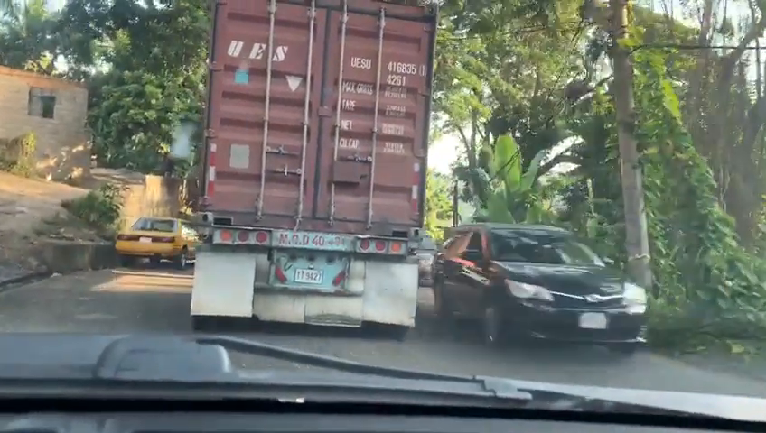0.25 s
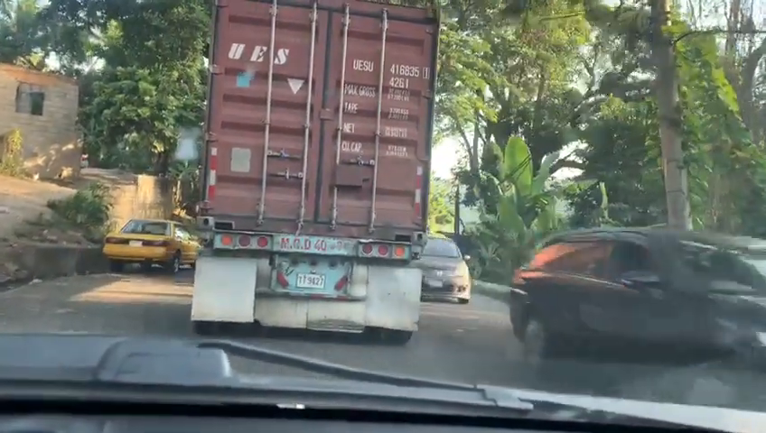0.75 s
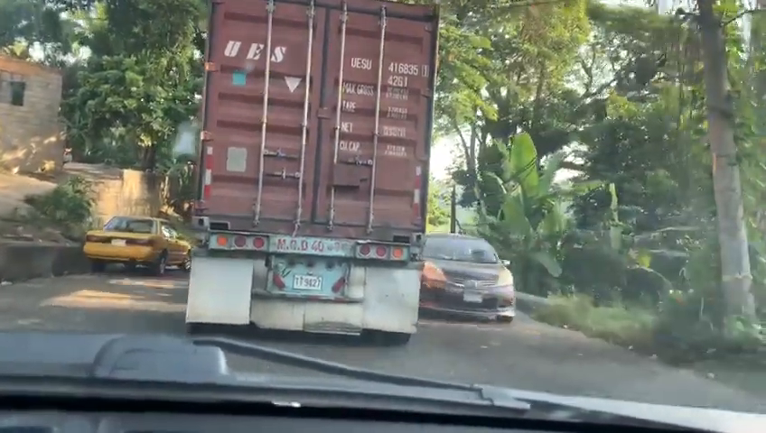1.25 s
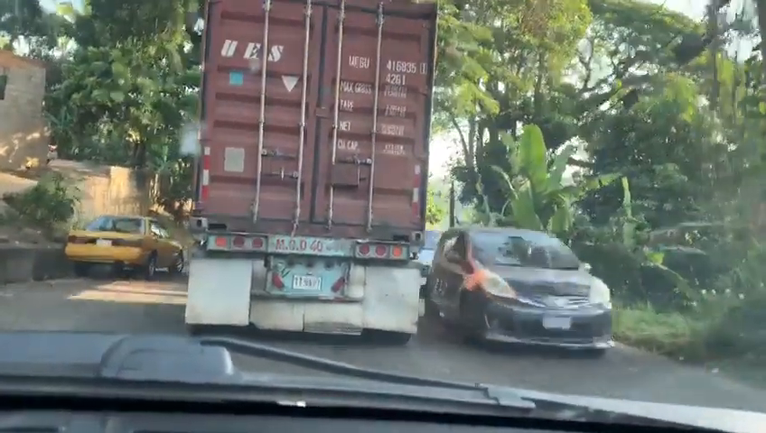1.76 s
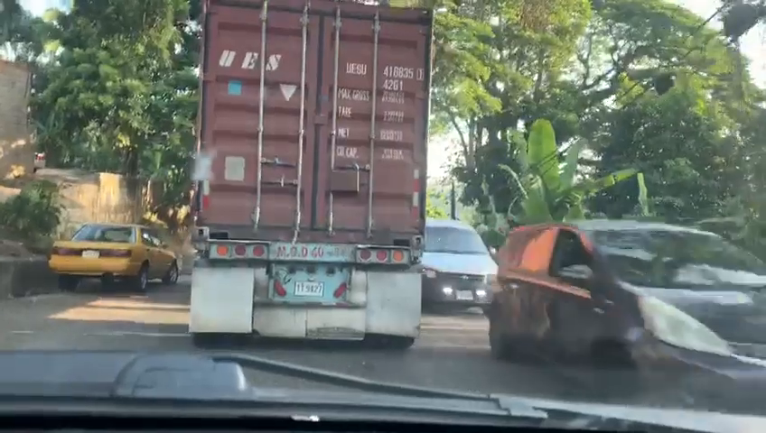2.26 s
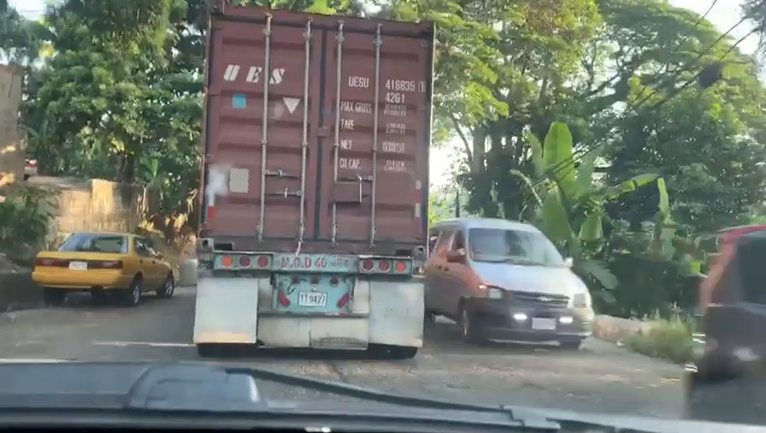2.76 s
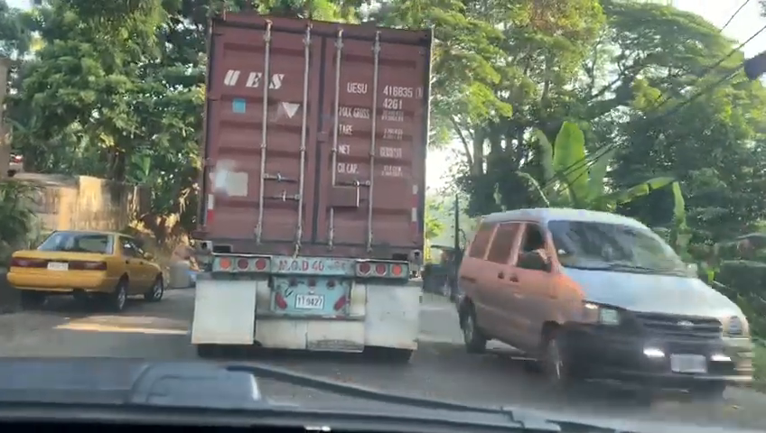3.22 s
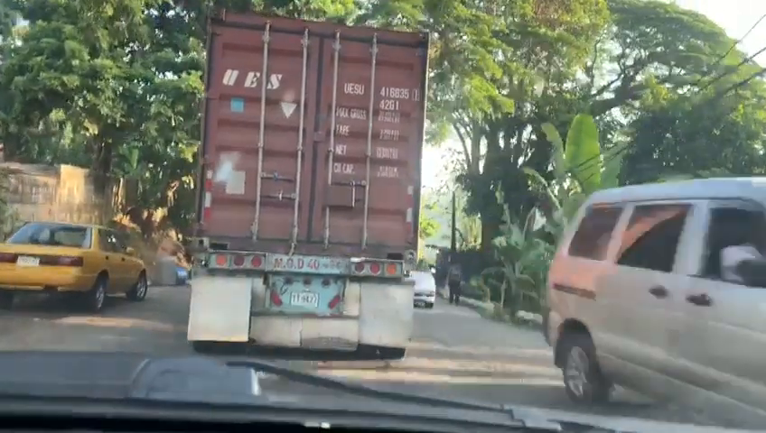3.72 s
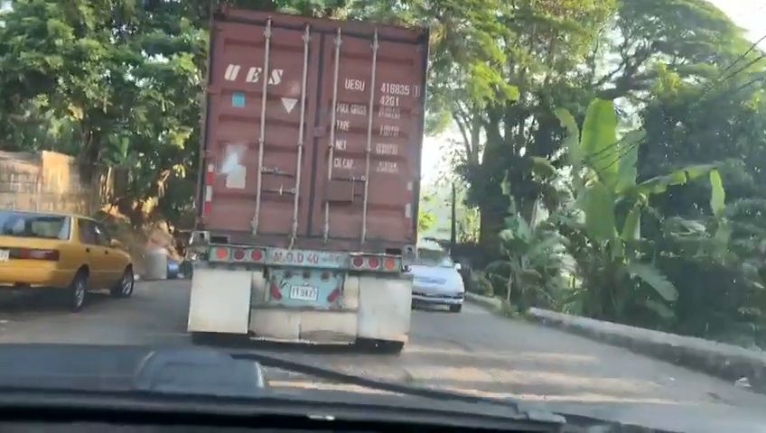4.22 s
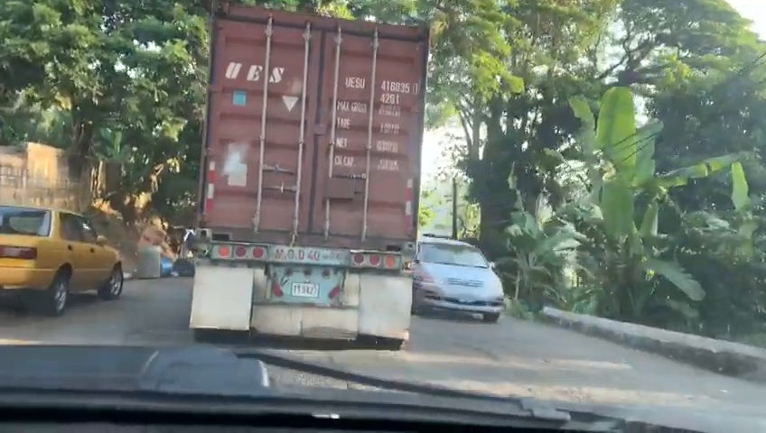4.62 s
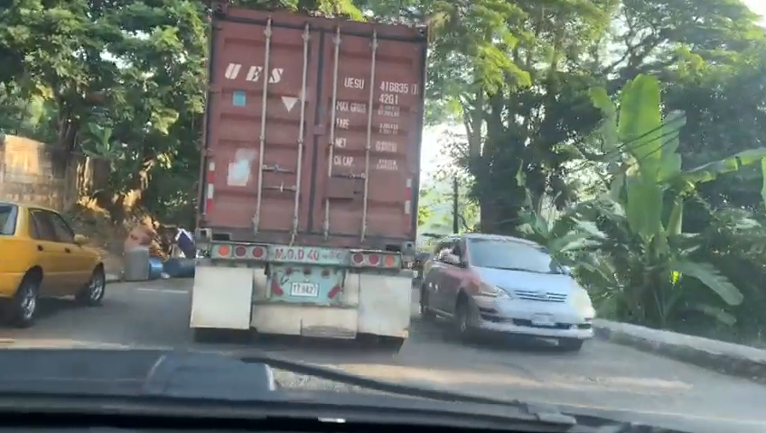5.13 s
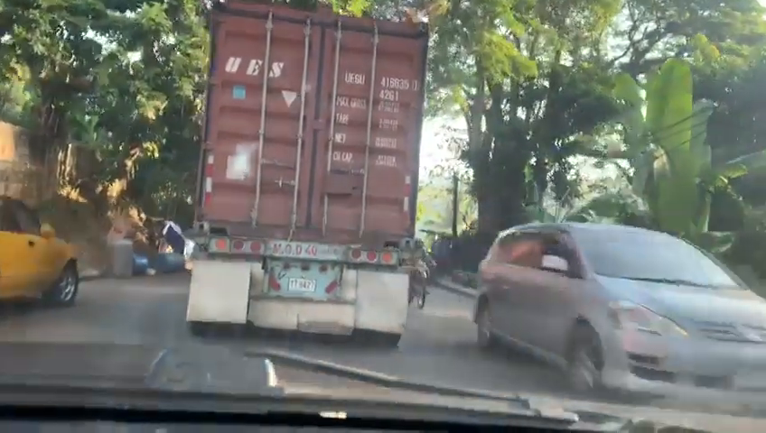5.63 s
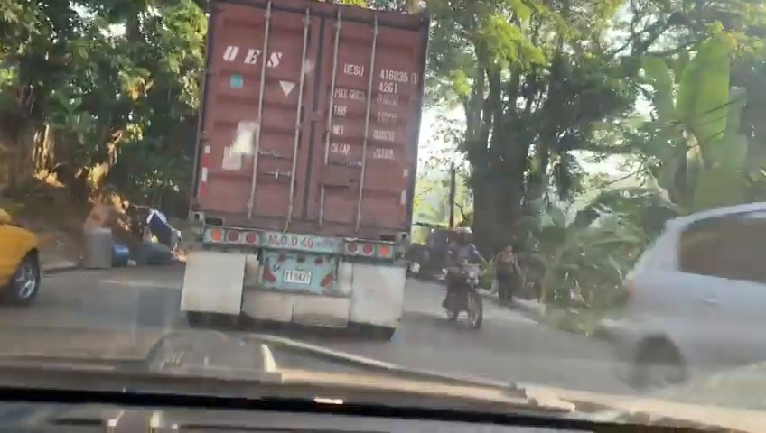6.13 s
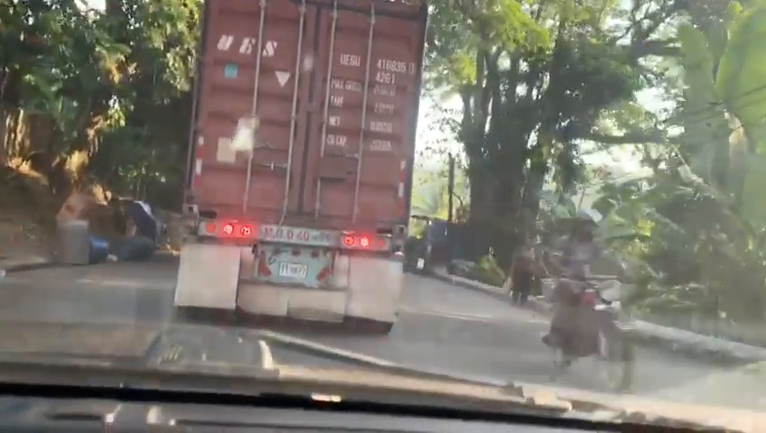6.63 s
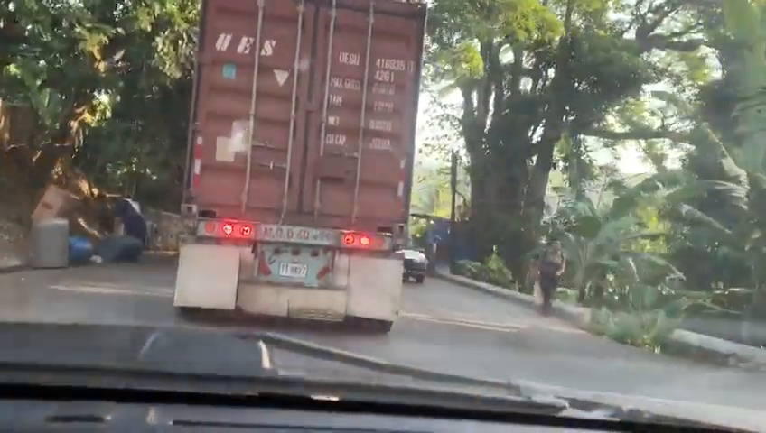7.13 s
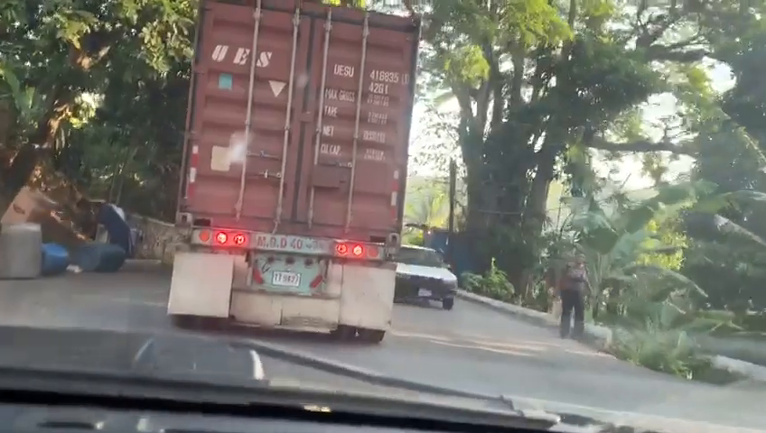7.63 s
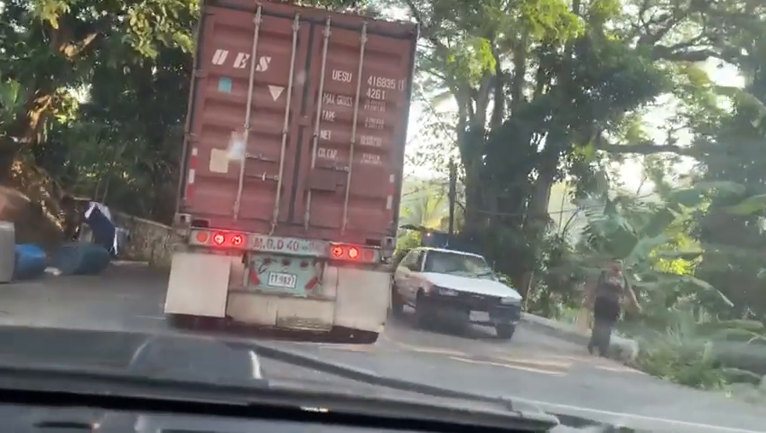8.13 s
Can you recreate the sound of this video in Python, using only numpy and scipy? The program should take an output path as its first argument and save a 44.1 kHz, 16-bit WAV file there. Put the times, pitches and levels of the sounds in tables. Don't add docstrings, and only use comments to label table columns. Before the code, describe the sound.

Low idling rumble and whooshing oncoming traffic in a rolling car cabin, hard joint thuds, finally a rough rapid exhaust rattle from a heavy truck.

```python
import sys
import numpy as np
from scipy import signal
from scipy.fft import rfft, irfft, next_fast_len
from scipy.io import wavfile
from scipy.ndimage import uniform_filter1d, map_coordinates

SR = 44100
rng = np.random.default_rng(int(sys.argv[2]) if len(sys.argv) > 2 else 0)


def unload_audio(sound):
    columns = np.transpose(np.atleast_2d(sound))
    steps = np.round(np.clip(columns, -1, 1) * 32767)
    wavfile.write(sys.argv[1], SR, steps.astype(np.int16))


def amplitude_ratio(level_db):
    exponent = np.asarray(level_db, float) / 20
    return 10 ** exponent


N = 369028

# time in seconds, blast rate in Hz, effort in dB, high pipe note over low in dB.
BRAKE = [(6.9, 34.83, -27, -1), (7.0, 34.65, -26, 5.5), (7.2, 33.92, -23, -2), (7.26, 33.24, -14.5, -10),
         (7.53, 28.39, -11, -5.5), (7.68, 31.15, -16.5, -1), (7.83, 33.11, -13.5, 10),
         (7.885, 32.74, -14, 9), (7.925, 28.77, -13.5, 15), (8.04, 29.13, -13.5, 11), (8.12, 29.14, -16, 3),
         (8.26, 31.01, -14, 8.5), (8.37, 31.63, -14, 14)]
# time in seconds, high note in Hz, low note in Hz.
PIPE_NOTES = [(6.9, 263, 151), (7.5, 265, 150), (7.7, 292, 156), (8.1, 308, 147), (8.37, 323, 166)]
# time in seconds, level in dB.
STUMBLES = [
    (7.33, -7),
    (7.39, -8),
    (7.49, -8),
    (7.555, -8),
    (7.625, -6),
    (7.655, -6),
]
# delay in seconds, level in dB.
ECHOES = [(.0065, -41), (.012, -23), (.019, -15.5), (.026, -25.5), (.04, -21.5)]
# time in seconds, peak in dB.
SNAPS = [(7.8325, -18), (7.8625, -21), (7.9278, -26), (7.9617, -23), (7.9967, -22), (8.0306, -18),
         (8.064, -24), (8.1004, -24.5), (8.1348, -19), (8.1688, -25.5), (8.2022, -21), (8.2341, -23.5),
         (8.2665, -23.5), (8.298, -23), (8.3299, -23)]
# time in seconds, peak in dB.
ROCKER_BLOWS = [(7.8894, -34), (7.9264, -38), (7.9608, -31.5), (7.9957, -31), (8.0301, -34), (8.0995, -31),
                (8.1394, -44), (8.1678, -45), (8.2342, -28), (8.2666, -29), (8.2975, -29), (8.33, -25)]
# time in seconds, fourth, fifth and seventh order in dB.
BRAKE_ORDERS = [(6.9, -36, -38, -38), (7.0, -27.5, -41, -30), (7.2, -26, -34, -32),
                (7.27, -16.5, -33, -27.5), (7.4, -21, -29, -28.5), (7.48, -23, -26, -31),
                (7.56, -27, -20, -33), (7.66, -28, -27, -44), (7.749, -30, -36, -37),
                (7.97, -37.5, -29, -40.5), (8.37, -36, -30, -38)]
# frequency in Hz, density in dB per Hz.
TICK_SPECTRUM = [(2000, -30), (5000, -18), (8000, -12), (9300, -8), (10400, 2), (11500, -1), (12500, -25)]
COVER_SPECTRUM = [(2000, -28), (2500, -3), (3200, -9.5), (3800, -3.5), (4400, -4), (5000, -10),
                  (6500, -24.5)]
CRACK_SPECTRUM = [(1200, -35), (2200, -5.5), (5000, -6.5), (9000, -3), (12000, -2.5), (13000, -38)]
SIZZLE_SPECTRUM = [(5000, -40), (7500, -6), (8700, -5), (9800, -7.5), (12300, -14), (13000, -42)]

# time in seconds, firing rate in Hz.
IDLE = [(0, 21.54), (1.5, 21.76), (2.5, 22.44), (3.8, 22.82), (5.2, 23.19), (6.5, 23.47), (8.37, 24.32)]
# multiple of the firing rate, early level in dB, late level in dB.
ENGINE_ORDERS = [(3, -28, -28.5), (7, -32, -31.5), (9, -40, -39.5), (10, -39, -31.5), (11, -33, -40.5),
                 (15, -37, -37.5)]
# time in seconds, lift in dB.
LOAD = [(0, -5), (.5, -10), (.9, 2), (1.3, -7.5), (1.6, 2.5), (2.1, 3.5), (2.3, -3.5), (2.9, 5), (3.6, 0.5),
        (4.4, 2), (5.2, 3), (5.7, 4), (6.2, 1.5), (6.6, 2), (7, -1.5), (8.37, -1)]
# time in seconds, pitch in Hz, road shake in dB.
BOOM = [(0, 65.27, -26), (1.4, 65.1, -26.5), (1.7, 65.4, -26.5), (1.85, 76.7, -38.5), (2.15, 57.9, -19.5),
        (2.45, 63.4, -31.5), (2.75, 65, -32), (3.2, 50.81, -23.5), (4.15, 53.32, -20), (4.85, 56.3, -21.5),
        (5.05, 65.6, -23), (5.25, 59.56, -15.5), (5.95, 60.5, -17.5), (6.3, 71.87, -35),
        (6.75, 61.85, -30.5), (7.15, 71.2, -24.5), (7.9, 61.22, -25), (8.37, 61, -18.5)]
# time in seconds, swell of the boom in dB.
JOLTS = [(.81, 2), (1.1, -11), (1.42, 6.5), (2.24, 4), (2.38, 15), (4.131, 3.5), (4.35, -6), (4.8, 10),
         (4.942, 7), (5.22, -3), (6.43, 13), (6.54, 14), (6.8, 9.5), (7.66, -5), (7.86, 5), (8.09, 3)]
# start in seconds, end in seconds, pitch in Hz, level in dB.
NEARING = (4.33, 4.66, 308, -29)

# start in seconds, length in seconds, level in dB, tilt in dB per overtone.
TAPS = [
    (2.999, 0.094, -44.5, 0.6),
    (3.197, 0.075, -49, 0),
]
# multiple of the disc pitch, level in dB.
HORN_OVERTONES = [(2, 1), (3, -21), (4, 1), (5, 1.5), (6, -5), (7, -7), (8, -18), (9, -12), (10, -13),
                  (11, -12.5), (12, -12), (13, -17), (14, -19)]
HORN_HZ = (491, 414)

# time in seconds, peak in dB, note in Hz.
BUMPS = [
    (2.394, -28, 110),
    (4.527, -24, 121),
    (4.639, -9, 163),
    (4.7, -16, 127),
    (4.772, -9, 151),
    (6.212, -13.5, 163),
    (6.27, -11, 157),
    (6.319, -10.5, 220),
    (6.356, -10, 172),
]
# start in seconds, end
# in seconds, pitch in Hz, level in dB.
DRONES = [(0.8, 1.25, 230, -34), (2.95, 3.7, 199, -33), (4.55, 4.92, 123, -25.5), (4.85, 5.15, 232, -28.5),
          (5.4, 5.9, 233, -30), (5.45, 5.75, 250, -36.5), (6.95, 7.8, 150, -34.5), (4.85, 5.1, 255, -27),
          (3.8, 4.55, 252, -30.5), (6.15, 6.95, 176, -29.5), (6.15, 6.3, 211, -35.5), (1.02, 1.65, 80, -31),
          (2.85, 3.5, 100, -30.5), (4.38, 4.58, 94, -26), (5.65, 6.05, 73, -28.5), (1.15, 1.5, 70, -23),
          (0.5, 0.71, 335, -36), (1.3, 1.67, 243, -31), (6.2, 6.55, 230, -36), (6.1, 6.5, 322, -31),
          (5.9, 6.6, 142, -33)]
# time in seconds, peak in dB, note in Hz.
KNOCKS = [
    (1.813, -29, 657),
    (2.389, -22, 675),
    (2.707, -22, 510),
]

# time in seconds, level in dB, t60 in seconds.
VENTS = [
    (4.03, -41, 2.5),
    (7.47, -41, 2.2),
    (7.58, -42, 2.5),
]
# start in seconds, end in seconds.
LEAKS = [
    (-1, .36),
    (3.02, 3.5),
    (4.07, 4.3),
    (7.25, 7.5),
    (7.55, 9),
]
LEAK_DB = [-49, -47.5, -53, -56, -54]
# start in seconds, end in seconds, centre in Hz, width in Hz,
# beat in Hz.
BUZZ = [
    (2.3, 4.05, 10250, 500, 46),
    (3.0, 3.78, 10900, 1300, 46),
    (6.88, 7.3, 9500, 300, 100),
    (5.4, 6.95, 10300, 700, 50),
]
BUZZ_DB = [-60.5, -61.5, -44.5, -80]
# nearest time in seconds, level in dB, seconds from nearest to half power.
PASSES = [(0.051, 9, 0.34), (1.15, -1.5, 0.05), (2, -9, 0.094), (3.2, -5.5, 0.18), (4.25, -1.5, 0.37),
          (4.9, -1, 0.37), (5.6, -2, 0.21), (6.15, -3.5, 0.18), (6.9, 3, 0.44), (7.599, 3, 0.27),
          (8.05, 0, 0.28)]

# frequency in Hz, density in dB per Hz.
JET_SPECTRUM = [(2000, -33), (3000, -12), (4000, -0.5), (5500, -4), (7500, -2), (9500, -16), (11500, -3.5),
                (12000, -42)]
RUMBLE_SPECTRUM = [(15, -45), (25, 3.5), (45, 13.5), (62, 12), (90, 10.5), (115, -1), (140, -57)]
BODY_SPECTRUM = [(80, -5.5), (110, -3.5), (160, 0), (240, -3), (350, -9.5), (420, -7), (480, -15),
                 (560, -67)]
ROAR_SPECTRUM = [(150, -28.5), (220, 1), (300, -1), (400, -1), (470, -12), (560, -52.5)]
CLATTER_SPECTRUM = [(350, -19), (480, -0.5), (580, 0), (650, 5), (730, -3), (840, 4), (930, -3), (1050, -1),
                    (1110, 1.5), (1180, -2), (1300, -6), (1700, -9), (2200, -64)]
HISS_SPECTRUM = [(1200, -3.5), (1700, 1.5), (2520, 1.5), (2720, -2.5), (3700, -4), (5000, -9),
                 (6500, -13.5), (7500, -14.5), (8500, -31.5)]
TOP_SPECTRUM = [(4500, -25), (6000, -6), (7500, -4), (8500, -2), (10000, 0), (11200, -4), (11600, -12),
                (11900, -40)]

# frequency in Hz, likeness from 0 to 1.
ALIKE = [(60, .95), (350, .83), (550, .3), (750, .6), (1200, .75), (1420, .99), (1650, .968), (1900, .55),
         (2600, .55), (3100, .2), (3800, .5), (6000, .15), (7300, .4), (7800, .995)]
# frequency in Hz, left lead in radians.
LEAD = [(300, -.5), (550, -2), (1100, -1.8), (1430, -3.14), (1700, -3.14), (1900, -6.4), (2250, -6.9),
        (2650, -9.4), (3800, -12.9), (6800, -19.1), (7700, -21.99), (9350, -21.99), (10400, -25.13),
        (11700, -25.3)]
# frequency in Hz, half of left minus right in dB.
CABIN_PAN = [(70, 0.5), (110, 0.5), (170, -2), (300, 0.3), (500, -0.4), (1000, 0.56), (3000, 1)]
# start in seconds, end in seconds, lower edge in Hz.
GAPS = [
    (3.76, 4.04, 11000),
    (5.3, 6.8, 11600),
    (6.95, 7.2, 9850),
]
# frequency in Hz, band level over its step in dB.
STEPS = [(200, 26), (850, 15), (1200, 9), (1500, 4), (2200, 5), (2700, -.5), (3200, 2), (4000, .5),
         (4700, -1), (5400, -2), (6200, -.5), (7000, 1), (7600, 0), (8000, -4), (9300, -4), (10000, 3),
         (11300, 2), (11700, -1), (11950, -20)]

PULSE_S = np.arange(-400, 900) / SR


def along(points, hz):
    f, v = np.transpose(points)
    return np.interp(np.log(hz + 1), np.log(f + 1), v)


def unit(x):
    return x / np.sqrt(np.mean(x ** 2) + 1e-20)


def curves(rows):
    s, *cols = np.transpose(rows)
    return [np.interp(np.arange(N) / SR, s, c) for c in cols]


def gate(start_s, end_s, fade_s):
    t = np.arange(N) / SR
    return np.clip(np.minimum(t - start_s, end_s - t) / fade_s, 0, 1)


def wobble(rate_hz):
    knots = rng.standard_normal(int(N * rate_hz / SR) + 4)
    return map_coordinates(knots, [np.arange(N) * rate_hz / SR])


def filtered(x, response):
    m = next_fast_len(N + 8192)
    return irfft(rfft(x, m) * response(np.fft.rfftfreq(m, 1 / SR)), m)[..., :N]


def white():
    return rng.standard_normal((2, N))


def ports(pair, spectrum):
    m = next_fast_len(N + 8192)
    hz = np.fft.rfftfreq(m, 1 / SR)
    turn = np.arccos(np.clip(along(ALIKE, hz), 0, 1)) / 2
    lead = np.exp(.5j * along(LEAD, hz))
    mid, side = rfft(pair, m) * amplitude_ratio(along(spectrum, hz)) * [np.cos(turn), np.sin(turn)]
    return unit(irfft([(mid + side) * lead, (mid - side) / lead], m)[:, :N])


def noise(patchy_db):
    z = signal.stft(white(), nperseg=512)[2]
    field = rng.standard_normal((3,) + z.shape[1:])
    field = uniform_filter1d(uniform_filter1d(field, 4, 1), 12, 2)
    gain_db = patchy_db * unit(field[:2] + 0.8 * field[2])
    return signal.istft(z * amplitude_ratio(gain_db), nperseg=512)[1][:, :N]


def tone(hz, db, lag_s):
    turns = np.cumsum(hz) / SR
    return np.sqrt(2) * amplitude_ratio(db) * np.sin(2 * np.pi * np.array([turns - hz * lag_s, turns]))


def burst(cycles, swell, fall):
    envelope = np.exp(-(cycles / np.where(cycles < 0, swell, fall)) ** 2)
    return -envelope * np.cos(2 * np.pi * cycles)


def brake():
    rate, effort_db, bright_db = curves(BRAKE)
    high_db = effort_db + np.minimum(bright_db, 0)
    low_db = effort_db - np.maximum(bright_db, 0)
    on = gate(6.9, 9, 0.072)
    turns = np.cumsum(rate) / SR
    turns -= turns[round(8.0372 * SR)]
    turns -= .15 * gate(-1, 7.68, .08)
    at = np.flatnonzero((np.diff(np.floor(turns)) > 0) & (on[1:] > 0))
    blasts = exhaust_blasts(at, high_db, low_db)
    rasp = amplitude_ratio(high_db - 27.5) * gate(7.62, 8.0, 0.089) * ports(noise(patchy_db=0.0), COVER_SPECTRUM)
    ticks = amplitude_ratio(high_db - 36) * gate(7.8, 9, 0.21) * valve_ticks(at)
    second = tone(2 * rate, high_db - 14.5 + 3 * wobble(8.5), 0.00059)
    return on * (blasts + rasp + ticks + second + brake_hum(turns, rate) + rocker_rings(at))


def train(at, pulses):
    out = np.zeros((2, N + 900))
    for i, pulse in zip(at, pulses):
        out[:, i - 400:i + 900] += pulse
    return out[:, :N]


def stack_time():
    return PULSE_S - np.array([[.00055], [0]])


def exhaust_blasts(at, high_db, low_db):
    high_hz, low_hz = curves(PIPE_NOTES)
    late, pan_db = stack_time(), np.array([[-1.2], [1.2]])
    pulses = []
    for i in at:
        size, tune = rng.standard_normal(2)
        weak_db = sum(db for s, db in STUMBLES if abs(s - i / SR) < .014)
        sharp = amplitude_ratio(high_db[i] + 12.0) * burst(high_hz[i] * (1 + 0.036 * tune) * late, 0.91, 0.95)
        deep = amplitude_ratio(low_db[i] + 5.5) * burst(low_hz[i] * (late - .0055), 0.45, 0.66)
        pulses.append(amplitude_ratio(weak_db + 0.43 * size + pan_db) * (sharp + deep))
    blasts = train(at, pulses)
    echo = sum(amplitude_ratio(db) * np.pad(blasts, ((0, 0), (round(s * SR), 0)))[:, :N] for s, db in ECHOES)
    return blasts + echo


def valve_ticks(at):
    since = PULSE_S + .0055
    snap = np.exp(-np.abs(since) / np.where(since > 0, .0022, .0009))
    cover = np.exp(-np.abs(since) / np.where(since > 0, .005, .002))
    snaps, covers = [], []
    for i in at:
        near_db = [db + 22 for s, db in SNAPS if abs(s + .006 - i / SR) < .013]
        heard_db = near_db[0] if near_db else -6
        snaps.append(amplitude_ratio(heard_db + 0.8 * rng.standard_normal()) * snap)
        covers.append(amplitude_ratio(0.6 * rng.standard_normal()) * cover)
    hits, rattle = train(at, snaps), train(at, covers)
    open_db = 5.5 * gate(8.2, 9, .04)
    out = amplitude_ratio(-4 * gate(8.21, 9, .02)) * ports(white() * hits, TICK_SPECTRUM)
    out += amplitude_ratio(-4.0 + open_db) * ports(white() * rattle, COVER_SPECTRUM)
    out += amplitude_ratio(-11.5) * gate(6.6, 9, 0.18) * ports(white() * hits, CRACK_SPECTRUM)
    sizzle = filtered(white() * hits, lambda hz: amplitude_ratio(along(SIZZLE_SPECTRUM, hz)))
    return out + amplitude_ratio(-13.5) * unit(sizzle)


def rocker_rings(at):
    late, pulses = stack_time(), []
    for i in at:
        struck = sum(amplitude_ratio(db) for s, db in ROCKER_BLOWS if abs(s + .004 - i / SR) < .013)
        main_hz = 3820 * (1 + 0.013 * rng.standard_normal())
        ring = burst(main_hz * (late + .004), 4.0, 9)
        ring = ring + 0.55 * burst(2520 * (late + .003), 3.9, 7)
        ring = ring + 0.45 * burst(4550 * (late + .004), 4.5, 8)
        pulses.append(struck * ring)
    return amplitude_ratio(-2) * train(at, pulses)


def brake_hum(turns, rate):
    locked, out = np.array([turns - rate * .0008, turns]), 0
    for k, phase, db in zip((4, 5, 7), (0, -.8, -1.6), curves(BRAKE_ORDERS)):
        level = np.sqrt(2) * amplitude_ratio(db + 1.2 * wobble(8))
        out = out + level * np.sin(2 * np.pi * k * locked + phase)
    return out


def engine():
    t, out = np.arange(N) / SR, 0
    load_db, rate = curves(LOAD)[0], curves(IDLE)[0]
    late = np.clip((t - 3.9) / 0.57, 0, 1)
    for k, early_db, late_db in ENGINE_ORDERS:
        db = early_db + late * (late_db - early_db) + (k == 7) * load_db
        out = out + tone(k * rate * (1 + 0.0021 * wobble(8)), db + 1.1 * wobble(3.01), 0.00065)
    return out


def boom():
    t = np.arange(N) / SR
    jolt_s, lull_after_s, lull_s, lull_db = 0.042, 0.068, 0.029, -12
    boom_hz, shake_db = curves(BOOM)
    jolt_db = 0
    for s, db in JOLTS:
        jolt_db = jolt_db + db * np.exp(-((t - s) / jolt_s) ** 2)
        jolt_db = jolt_db + lull_db * np.exp(-((t - s - lull_after_s) / lull_s) ** 2)
    return tone(boom_hz + 1.536 * wobble(12), shake_db + jolt_db + 0.54 * wobble(14), 0.00073)


def horn():
    t, out = np.arange(N) / SR, 0
    high_hz, low_hz = HORN_HZ
    lag_s = .00046
    for s, length, db, tilt_db in TAPS:
        bend = 1 - 0.0196 * np.exp(-np.abs(t - s) / 0.02) + 0.0016 * wobble(20)
        stack = 0
        for k, level in HORN_OVERTONES:
            ragged_db = level + tilt_db * max(k - 5, 0) + 3 * wobble(30.36)
            speaks = gate(s + 0.0012 * k, s + length - 0.0017 * k, .012)
            stack = stack + speaks * tone(k * high_hz * bend, ragged_db, lag_s)
            stack = stack + tone(k * low_hz * bend, level - 13 - 1.3 * k, lag_s)
        out = out + amplitude_ratio(db) * gate(s, s + length, 0.011) * stack
    street = rng.standard_normal((2, SR // 4)) * amplitude_ratio(-60 * t[:SR // 4] / 0.6)
    return out + amplitude_ratio(-30.5) * signal.fftconvolve(out, street, axes=1)[:, :N]


def bumps():
    t = np.arange(N) / SR
    thuds = sum(amplitude_ratio(db - 3.5) * burst(hz * (t - s - .008), 1.0, 2.2) for s, db, hz in BUMPS)
    return np.array([thuds, thuds])


def drones():
    t, out = np.arange(N) / SR, 0
    for start, end, hz, db in DRONES:
        swell = np.sin(np.pi / 2 * gate(start, end, 0.15))
        out = out + swell * tone(hz + 1.21 * wobble(5), db + 1.9 * wobble(6), .0006)
    return out + sum(amplitude_ratio(db - 1.0) * burst(hz * (t - s - .003), 0.66, 1.0) for s, db, hz in KNOCKS)


def tyre_whine():
    t = np.arange(N) / SR
    receding_hz = 333 + 47.2 * np.exp(-t / 0.0917)
    receding = gate(-1, 0.61, 0.075) * tone(receding_hz, -22.5 - 15 * t, 0.00037)
    start, end, hz, db = NEARING
    return receding + gate(start, end, 0.021) * tone(hz + 0.93 * wobble(9), db, 0.00033)


def vents():
    t = np.arange(N) / SR
    flow = sum(amplitude_ratio(db - 60 * np.abs(t - s) / t60) * gate(s, s + 2, 0.03) for s, db, t60 in VENTS)
    return flow * ports(noise(patchy_db=3.5), JET_SPECTRUM)


def leaks():
    t, out = np.arange(N) / SR, 0
    rise_db_per_s, fall_db_per_s = 200, 15.5
    for (start, end), db in zip(LEAKS, LEAK_DB):
        before_s, after_s = np.maximum(start - t, 0), np.maximum(t - end, 0)
        out = out + amplitude_ratio(db - rise_db_per_s * before_s - fall_db_per_s * after_s)
    return out


def insects():
    t, out = np.arange(N) / SR, 0
    for (start, end, hz, width, beat), db in zip(BUZZ, BUZZ_DB):
        chop = (1 + .9 * np.sin(2 * np.pi * beat * t + 2 * wobble(6))) * amplitude_ratio(2.6 * wobble(13))
        band = [(hz - 2 * width, -50), (hz - width / 2, 0), (hz + width / 2, 0), (hz + 2 * width, -50)]
        out = out + amplitude_ratio(db) * gate(start, end, 0.14) * ports(white() * chop, band)
    return out


def traffic(floor_db, lift_db):
    t = np.arange(N) / SR
    near = sum(amplitude_ratio(2 * (db + lift_db)) / (1 + ((t - s) / reach) ** 2) for s, db, reach in PASSES)
    return floor_db + 10 * np.log10(1 + near)


def road():
    shake_db = curves(BOOM)[1]
    rumble_db = -24.5 + 0.25 * (shake_db - shake_db.mean())
    turns = np.cumsum(curves(IDLE)[0]) / SR
    knock = np.exp(-2.5 * (turns % 1)) * amplitude_ratio(9.0 * (turns % 2 < 1)) * amplitude_ratio(2.0 * wobble(6.4))
    heavy = np.exp(-4 * (turns / 2 % 1)) * gate(4.6, 7.5, 2.7)
    slowing_db = -5 * gate(7.7, 12, 0.99)
    body_db = traffic(-28.5, lift_db=-4.5) + slowing_db + 0.45 * wobble(8.4)
    roar_db = traffic(-40, lift_db=5.5) + slowing_db + wobble(6.6)
    clatter_db = traffic(-35, lift_db=-1.5) + 0.8 * wobble(11)
    hiss_db = traffic(-45, lift_db=2) + 0.41 * wobble(9)
    leaves = amplitude_ratio(-59)
    out = amplitude_ratio(rumble_db + slowing_db + 2.8 * wobble(10)) * ports(noise(patchy_db=2.0), RUMBLE_SPECTRUM)
    out += amplitude_ratio(body_db) * ports(noise(patchy_db=1.5), BODY_SPECTRUM)
    out += amplitude_ratio(roar_db) * ports(noise(patchy_db=3.0), ROAR_SPECTRUM)
    out += amplitude_ratio(clatter_db) * ports(noise(patchy_db=1.0) * (1 + 0.3 * knock), CLATTER_SPECTRUM)
    out += amplitude_ratio(hiss_db) * ports(noise(patchy_db=2.0) * (1 + 0.16 * knock + .5 * heavy), HISS_SPECTRUM)
    return out + (leaks() * amplitude_ratio(1.2 * wobble(8.5)) + leaves) * ports(noise(patchy_db=4.0), TOP_SPECTRUM)


def scene():
    cabin = road() + engine() + boom() + tyre_whine() + bumps() + drones()
    sides = np.array([[1], [-1]])
    cabin = filtered(cabin, lambda hz: amplitude_ratio(along(CABIN_PAN, hz) * sides))
    return cabin + brake() + horn() + insects() + vents()


def coarse(x):
    frame, grid, bands, step_wander_db = 1024, 230, 36, 5.5
    rise = np.cumsum(np.kaiser(frame + 1, 4 * np.pi))
    rise = np.sqrt(rise[:-1] / rise[-1])
    window = np.r_[rise, rise[::-1]][:, None]
    k, n = np.arange(bands * 16) + .5, np.arange(2 * frame) + .5 + frame / 2
    basis = np.sqrt(2 / frame) * window * np.cos(np.pi / frame * np.outer(n, k))
    lead, count = 2 * frame - grid, N // frame + 4
    pair = np.pad([x[0] + x[1], x[0] - x[1]], ((0, 0), (lead, count * frame - N - lead)))
    pair = pair.reshape(2, count, frame)
    c = np.concatenate([pair[:, :-1], pair[:, 1:]], axis=2) @ basis
    c = c.reshape(2, count - 1, bands, 16)
    wander = unit(uniform_filter1d(rng.standard_normal((count - 1, bands, 1)), size=3, axis=0))
    power = uniform_filter1d(np.mean(c ** 2, axis=(0, 3)), size=3, axis=1)
    level = np.sqrt(power + 4e-6)[..., None]
    over_db = along(STEPS, k * SR / 2 / frame).reshape(bands, 16)
    step = level * amplitude_ratio(step_wander_db * wander - over_db)
    rounded = np.sign(c) * np.floor(np.abs(c) / step + .4) * step
    frames = rounded.reshape(2, count - 1, -1) @ basis.T
    out = np.pad(frames[..., :frame], ((0, 0), (0, 1), (0, 0)))
    out = out + np.pad(frames[..., frame:], ((0, 0), (1, 0), (0, 0)))
    mid, side = out.reshape(2, -1)[:, lead:lead + N]
    return np.array([mid + side, mid - side]) / 2


def roll_off(x):
    return signal.sosfilt(signal.butter(12, 12380, fs=SR, output="sos"), x)


def record(dry):
    soft = dry / (1 + np.abs(dry / .97) ** 8) ** (1 / 8)
    lost = sum(gate(a, b, .03) * filtered(soft, lambda hz: hz > edge) for a, b, edge in GAPS)
    mix = coarse(soft - lost)
    return roll_off(mix)


dry = scene()
out = record(dry)
unload_audio(out)
```